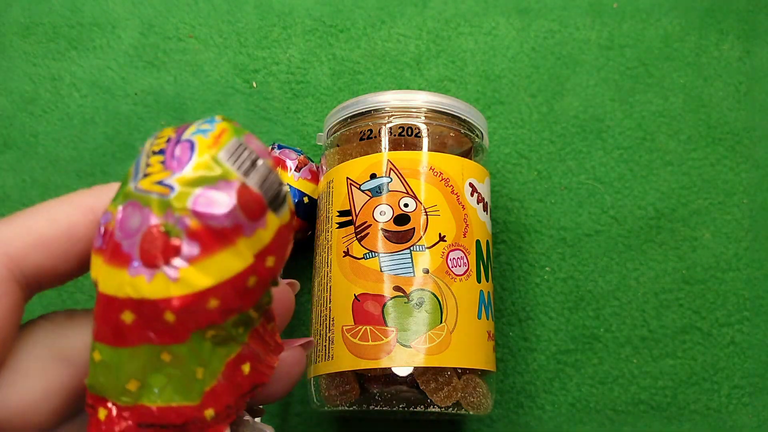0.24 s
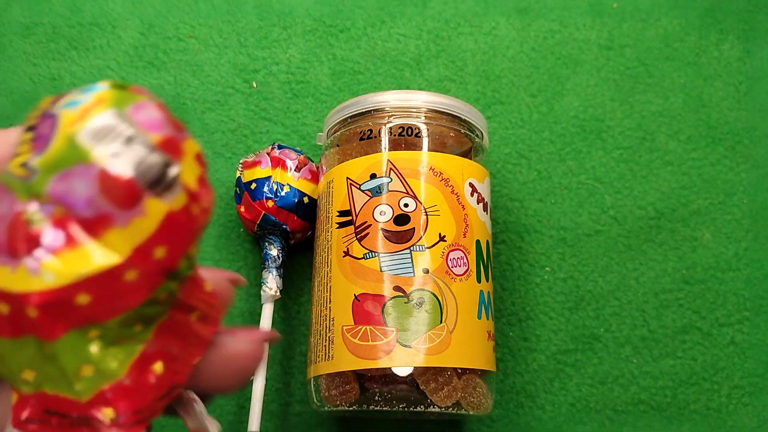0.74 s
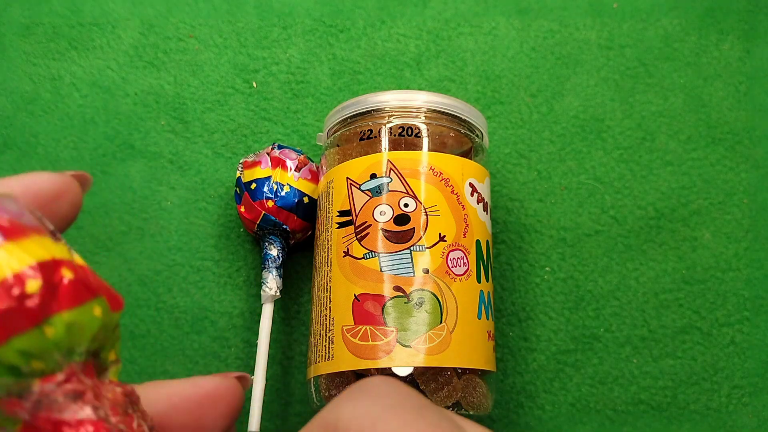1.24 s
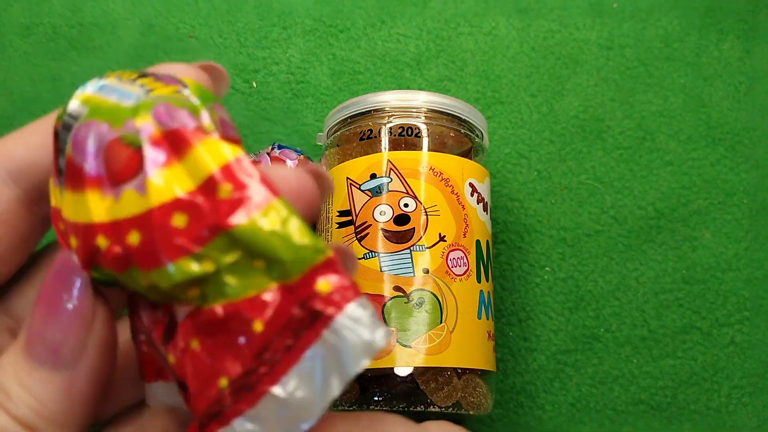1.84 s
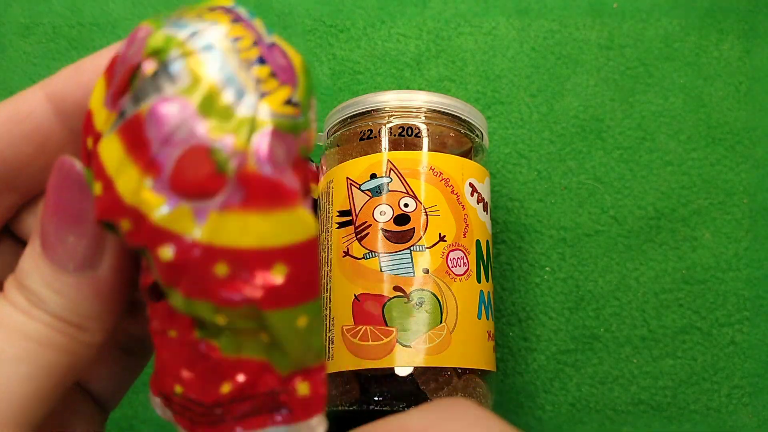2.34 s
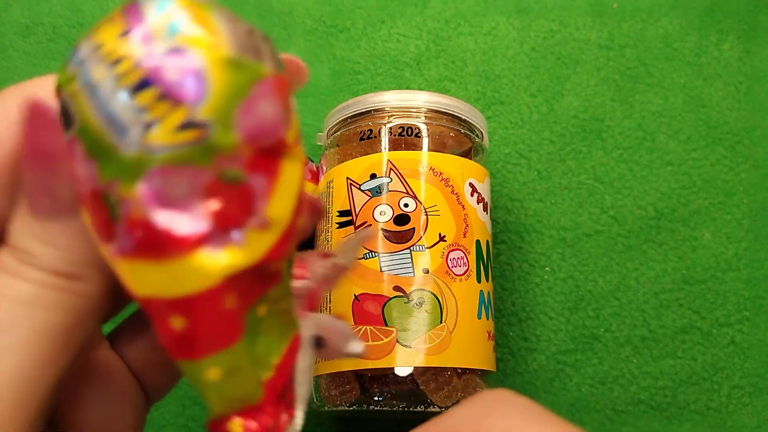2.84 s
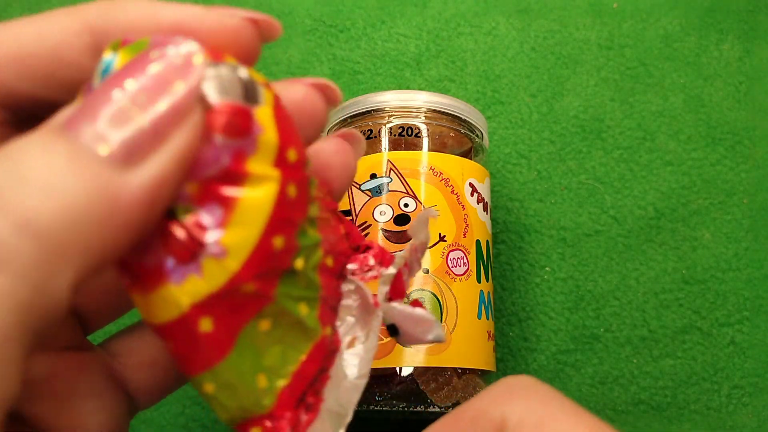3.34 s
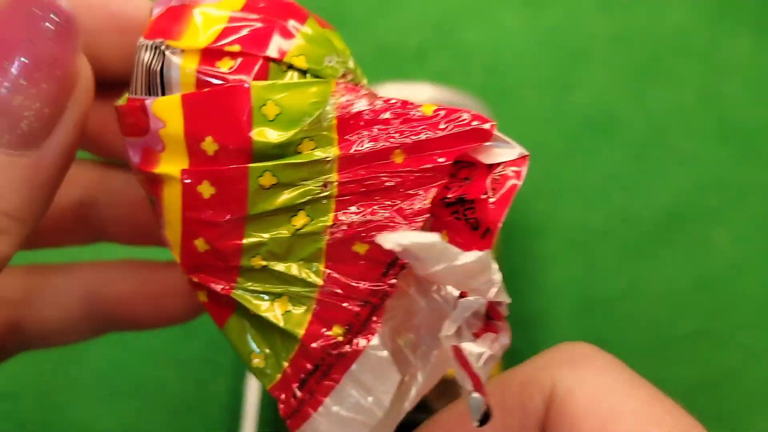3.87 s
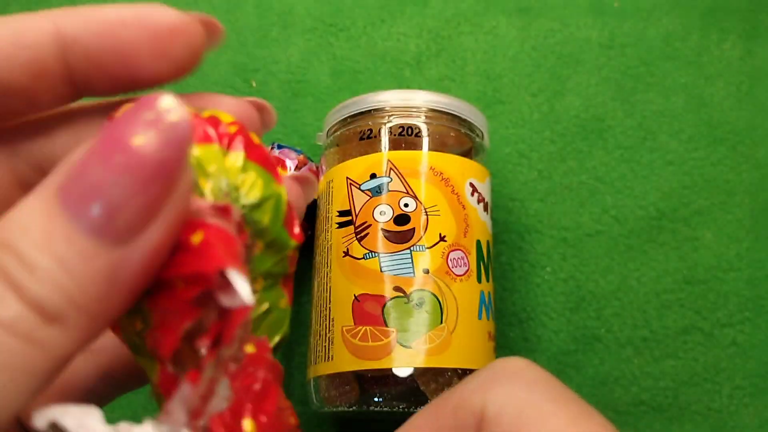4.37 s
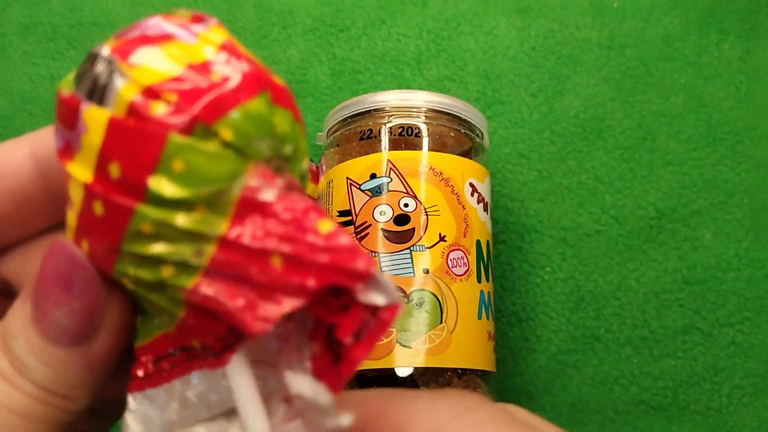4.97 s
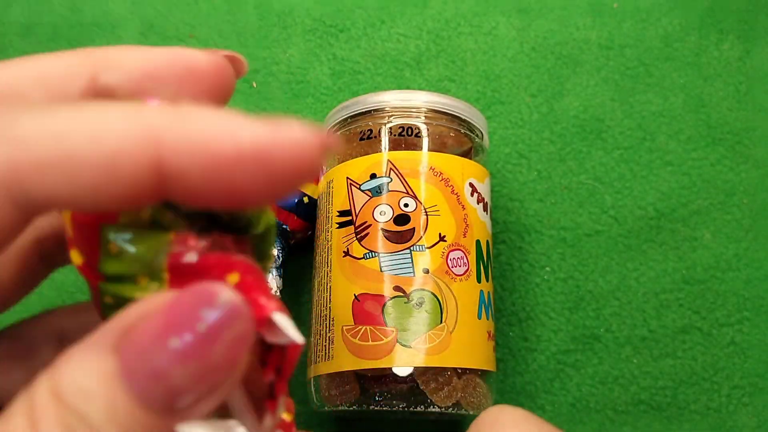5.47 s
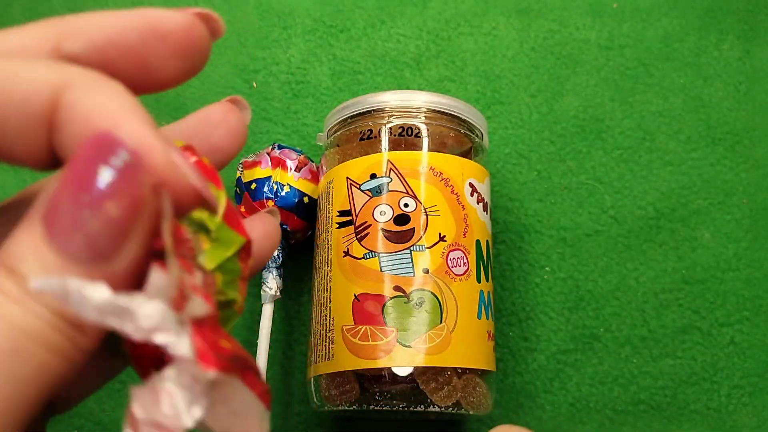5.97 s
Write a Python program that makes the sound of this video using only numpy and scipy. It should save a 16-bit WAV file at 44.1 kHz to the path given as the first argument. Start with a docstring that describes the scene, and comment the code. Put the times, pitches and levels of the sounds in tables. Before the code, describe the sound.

A foil candy wrapper is handled very close to the right side of a stereo microphone in a small, damped, nearly silent room. It begins with faint rustle and a few light ticks; at 0.5 s a tight run of crackles starts, thickening into loud crisp snaps at 0.8-1.0 s. More crinkles follow at 1.1-1.5 s, then a thin, quiet stretch until about 2. A short hollow scrape falls in pitch near 2.3, leading into a strong crunchy burst around 2.5. Isolated sharp cracks and soft rustles continue from 2.7 to 4.2, with a faint rising scrape at 3.2. Fuller crackles return at 4.35, 4.7 and 5.2, with a sharp snap at 5.5. It thins to faint rustle and a barely audible creak near 5.75, then a bright flurry at 6.0 ends with a rough fold creak. Soft dull finger knocks occur occasionally.

```python
"""In a small, damped, nearly silent room, a foil candy wrapper is peeled and twisted by hand at a table,
close to the right port of a small stereo microphone. Creases snap as millisecond noise bursts, and swarms
of random clicks rustle with every squeeze. A fold creaks near the end as regular slips ring its resonances.
Scraping noise rides on a hollow's moving pitch, and soft pushes are fingers knocking the sweet inside.
The table top adds a quick echo, the room a short tail and a faint hush."""
import sys
import numpy as np
from scipy import signal
from scipy.fft import rfft, irfft, next_fast_len
from scipy.io import wavfile

SR = 44100
rng = np.random.default_rng(int(sys.argv[2]) if len(sys.argv) > 2 else 0)


def int16_out(signal):
    """Quantize to a 16-bit WAV file."""
    q = np.round(np.clip(np.atleast_2d(signal).T, -1, 1) * 32767)
    wavfile.write(sys.argv[1], SR, q.astype(np.int16))


N = 273861
SIZE = next_fast_len(N + SR // 2)   # transform length, with space for the tails
HZ = np.maximum(np.arange(SIZE // 2 + 1) * SR / SIZE, 1)

# Pairs are left, right.
SNAP_PAN_DB, SNAP_PAN_SPREAD_DB = -8, 4.5   # a snap at the left port against the right: mean and spread
SCATTER_S, SCATTER_DB = [0.0026, 0.0021], [-4.5, -16.5]   # reflections off hands and foil: decay, level
BUCKLES_PER_S, BUCKLE_SPREAD_DB = 5000, 2.07
RUSTLE_LIKENESS = 0.1   # share of the rustle's power that is alike at both ports
KNOCK_BAND_HZ, KNOCK_S = (133, 456), 0.00035
KNOCK_GAIN_DB = 29   # added to every knock
LEFT_LAG_SAMPLES = 14
TABLE_ECHO_S, TABLE_ECHO_DB = [0.0022, 0.0025], -26.5   # delay after the direct sound
ROOM_T60_S, ROOM_DB, WALL_CUT_HZ = 0.19, [-6, -17], 8000
HUSH_DB = -85   # rms
CUTOFF_HZ = 16900


def from_db(db):
    """Amplitude factor of a level in dB."""
    return 10 ** (np.asarray(db) / 20)


def rms_one(x):
    """Scale a sound to an rms of 1."""
    return x / np.sqrt(np.mean(x ** 2) + 1e-20)


def in_time(rows):
    """Columns of a curve table, sample by sample."""
    s, *columns = np.transpose(rows)
    return [np.interp(np.arange(N) / SR, s, column) for column in columns]


def at_hz(points):
    """A spectrum table in dB, drawn over log frequency on the frequency grid."""
    hz, db = np.transpose(points)
    return np.interp(np.log(HZ), np.log(hz), db)


def causal(db):
    """Minimum-phase response of a dB spectrum, by folding its cepstrum."""
    cepstrum = irfft(db * np.log(10) / 20, SIZE)
    cepstrum[1:SIZE // 2] *= 2
    cepstrum[SIZE // 2 + 1:] = 0
    return np.exp(rfft(cepstrum))


def drift(rate_hz):
    """Slow random wandering with an rms of 1: noise through two equal one-pole lowpasses."""
    r = np.exp(-2 * np.pi * rate_hz / SR)
    wander = signal.lfilter([1], [1, -2 * r, r * r], rng.standard_normal(N + 4000))
    return rms_one(wander[4000:])   # skips the filter's start


def dying_noise(t60, count):
    """Noise that dies away exponentially, energy 1."""
    tail = rng.standard_normal(count) * from_db(-60 * np.arange(count) / SR / t60)
    return tail / np.sqrt(np.sum(tail ** 2))


def band(x, low_hz, high_hz):
    """Keep one band of a sound."""
    sos = signal.butter(2, [low_hz, high_hz], "band", fs=SR, output="sos")
    return signal.sosfilt(sos, x)


def snaps(port):
    """Each crease bursts with its own thud, body, edge and crack, scattered anew to each port."""
    # The creases that snap. Each row: start in seconds, then the peaks of thud, body, edge and crack in dB,
    # as coloured by the near port before scattering.
    creases = [(0.0597, -83.0, -59, -41, -45), (0.2024, -66, -64, -40, -49), (0.3373, -98, -81, -57, -61.5),
               (0.5099, -74, -47.0, -35, -37), (0.5232, -56.0, -55.0, -53, -53),
               (0.5307, -55, -36, -37, -43), (0.538, -60, -38, -38, -45), (0.5415, -34, -44, -39.0, -37),
               (0.554, -68.0, -46, -33, -40.0), (0.5618, -54, -42.5, -37, -46.0),
               (0.5671, -69, -35, -33.0, -37.0), (0.5806, -72.0, -53, -36, -44),
               (0.5911, -58.0, -45, -39.0, -42.5), (0.607, -54, -41, -44, -41),
               (0.6211, -47, -36.5, -31.5, -32.5), (0.6349, -48, -38, -46, -40),
               (0.727, -61.5, -38.5, -34, -38), (0.7966, -39, -30.5, -28, -27),
               (0.82, -66.0, -62.0, -37.5, -40), (0.8712, -36, -37, -25.5, -22.5),
               (0.8764, -48, -32, -18.5, -42), (0.8816, -54.0, -24.5, -20, -18.5),
               (0.9115, -45, -23, -24, -42), (0.9237, -49.0, -46, -27, -27),
               (0.9502, -56, -40, -59.0, -58.0), (0.9805, -62, -53.0, -38, -34.5),
               (0.9959, -51, -41, -39, -42.0), (1.096, -37, -23.5, -28.0, -28.5),
               (1.1457, -78, -68.0, -52, -36), (1.1646, -62, -60, -36, -30),
               (1.1736, -74.0, -53.0, -43, -31.0), (1.1789, -39, -28.5, -28.5, -25),
               (1.1856, -61, -32, -26.5, -21.5), (1.2438, -69, -58, -52, -55),
               (1.3707, -44, -34, -40.0, -40), (1.381, -37, -61, -47, -30.5),
               (1.4492, -39.5, -52, -31, -28), (1.4611, -66, -36, -33, -24),
               (1.7044, -83.0, -66, -47, -40.5), (1.89, -84.0, -60, -50, -35),
               (2.0465, -75, -65.0, -38.5, -40), (2.111, -36.5, -59, -51, -28.5),
               (2.137, -59, -52, -42.0, -42), (2.154, -49, -32, -24, -25),
               (2.2362, -54.0, -59.0, -33, -28.0), (2.244, -69, -62.0, -40, -30),
               (2.249, -53.0, -63.0, -55, -32), (2.256, -44, -53, -41.0, -31.0),
               (2.3317, -45, -41, -30, -37), (2.3959, -43.0, -42, -29.5, -29.5),
               (2.4435, -52, -34, -41, -34), (2.4546, -47, -37.0, -28, -25.5), (2.4678, -49, -30, -40, -36),
               (2.471, -45, -26, -22, -21.5), (2.4773, -33, -40, -39, -29),
               (2.4852, -31, -44.0, -44.0, -34), (2.4868, -31.5, -41, -35.0, -24.5),
               (2.5098, -32.5, -39, -29, -31), (2.5737, -89, -65.0, -61.0, -33),
               (2.6393, -76, -69, -58, -39.5), (2.686, -46, -40, -32, -27.0), (2.73, -35, -35.5, -41, -37),
               (2.742, -34.5, -31.5, -31.5, -47), (2.8892, -55, -45, -26, -16.5),
               (3.0137, -52, -42.5, -47.0, -46), (3.09, -55, -41, -35.5, -31.5),
               (3.1346, -49, -41.5, -49, -46), (3.201, -69, -62, -55, -44), (3.2068, -82, -69, -62, -36.5),
               (3.368, -65, -46, -27.0, -20.5), (3.4351, -46.5, -36.5, -54, -28.5),
               (3.4619, -48.5, -26, -26.5, -20.5), (3.5012, -46.5, -42, -38, -33.5),
               (3.5501, -52.5, -41, -33, -32.0), (3.58, -55, -33, -31.5, -27.5),
               (3.6147, -58, -39, -47, -26.5), (3.6443, -44.5, -34.5, -29, -21.5),
               (3.7633, -52, -35.5, -21, -18), (3.8798, -66.5, -61, -42.5, -42),
               (3.9547, -65, -47, -52, -20.5), (3.979, -76.0, -62.0, -52, -36.5),
               (4.0422, -43.5, -30, -30, -31), (4.0726, -52, -42, -31, -41), (4.075, -51, -51, -51, -28.5),
               (4.1049, -59, -54, -48, -41), (4.1434, -70, -54, -38.5, -47), (4.1833, -59, -33, -45, -16.5),
               (4.3232, -54, -54, -38.5, -28.5), (4.3422, -37.5, -46, -51, -38),
               (4.3531, -37, -33, -32, -45), (4.3551, -41, -35, -49, -33), (4.3627, -31, -24.0, -20, -24.0),
               (4.518, -43, -27, -37, -31), (4.698, -27, -21.5, -18.5, -19),
               (4.7446, -52, -42.0, -26.0, -25), (4.7796, -56, -49, -38, -18.0),
               (4.8135, -40, -28, -26.5, -23), (4.862, -62, -43, -28.5, -29),
               (4.8732, -82, -70, -51, -32.5), (4.9685, -62.0, -43, -37.0, -21),
               (5.0063, -65.0, -44, -37, -34), (5.0181, -61, -41, -33, -17.5),
               (5.0724, -77, -66.0, -60.0, -40), (5.1624, -70.5, -38, -30.0, -28.5),
               (5.1668, -56, -41, -33, -32), (5.1884, -51, -35, -33, -26.5),
               (5.2021, -62.0, -36, -24.5, -29), (5.2051, -38, -38, -27, -21),
               (5.2258, -41, -25.0, -17, -19), (5.3085, -68, -59, -58, -59),
               (5.4329, -56, -36.5, -35, -28.5), (5.4712, -65, -54, -37, -31.5),
               (5.4855, -37.5, -35.5, -44, -16.0), (5.8627, -50.5, -33.5, -34.5, -41),
               (5.9445, -52.5, -55, -49, -29.0), (5.9924, -47, -39, -46, -29.0),
               (6.0028, -43, -34, -49, -24), (6.009, -39.0, -39.0, -32, -18),
               (6.0151, -33, -24.5, -21.5, -15.5), (6.0306, -61, -58.0, -49.0, -28.0),
               (6.0538, -40, -32, -33, -11.5), (6.0562, -42.0, -37.0, -33, -23),
               (6.1552, -58, -38, -42, -29), (6.1688, -52, -35, -31.0, -29.0),
               (6.1827, -62.0, -34.0, -35.0, -53)]
    # Thud, body, edge and crack. Each row: low edge in Hz, high edge in Hz, length of the contact in seconds.
    burst_parts = [(556, 1165, 0.00078), (1460, 2337, 0.00065), (2840, 4190, 0.00042),
                   (4740, 12100, 0.00014)]
    rows = np.array(creases)
    time = np.arange(500) / SR
    noise = rng.standard_normal((len(rows), 3, 500))
    left_noise, right_noise, rattle = noise[:, 0], noise[:, 1], noise[:, 2]
    rattle[:, 6] = 4.7 * np.sign(rattle[:, 6])   # the buckle itself is one broad click amid its rattle

    bursts = 0
    for k, (low_hz, high_hz, length) in enumerate(burst_parts):
        quick_swell = time * np.exp(-2 * time / length)
        part = band(rattle * quick_swell, low_hz, high_hz)
        heard = signal.fftconvolve(part, port[None, :200], axes=1)
        gain = from_db(rows[:, 1 + k]) / np.abs(heard).max(axis=1)
        bursts = bursts + part * gain[:, None]

    out = np.zeros((2, N + 500))
    at = np.round(rows[:, 0] * SR).astype(int)[:, None] + np.arange(500)
    left_pan_db = SNAP_PAN_DB + SNAP_PAN_SPREAD_DB * rng.standard_normal((len(rows), 1))
    for side, (side_noise, pan_db) in enumerate([(left_noise, left_pan_db), (right_noise, 0)]):
        scatter = side_noise * from_db(SCATTER_DB[side]) * np.exp(-time / SCATTER_S[side])
        scatter[:, 0] = 1   # direct sound
        scattered = signal.fftconvolve(bursts, scatter, axes=1)[:, :500]
        np.add.at(out[side], at, from_db(pan_db) * scattered)
    return out[:, :N]


def squeezing():
    """Level in dB of each part of the rustle: squeezes swell and fade exponentially, their powers add."""
    # Squeezes of the foil. Each row: peak time in seconds, swell and fade in seconds per 20 dB,
    # rustle level in dB, then thud and crack in dB relative to it.
    squeezes = [(.04, 0.12, 0.35, -63.5, -8, 1.5), (0.202, 0.019, 0.012, -51, -17, -5),
                (.343, 0.02, 0.025, -71, -30, 4), (.43, 0.018, 0.13, -75, -4, 7.5),
                (0.511, 0.0086, .1, -57.5, -9.5, -7), (.56, 0.13, 0.22, -61, -5, -4),
                (.8, 0.012, 0.3, -53, -26, 7), (0.927, 0.1, 0.054, -40.5, -13, -8),
                (1.078, 0.036, 0.13, -50.5, -20, -6), (1.182, 0.045, 0.026, -42.5, -14, 3),
                (1.213, .05, 0.12, -62, -15, 5), (1.357, 0.013, 0.13, -47.5, -12.5, -4.5),
                (1.461, 0.033, 0.014, -46.5, -4.5, -1.5), (1.708, 0.048, 0.051, -67, -5, 14),
                (1.862, 0.094, 0.056, -56.5, -11, 7.5), (1.957, 0.035, 0.85, -61, -26, 5.4),
                (2.09, 0.14, .037, -53.5, -10, 3), (2.149, 0.016, 0.072, -53.5, 1, 14),
                (2.341, 0.24, 0.053, -46, -5.5, 4), (2.481, 0.017, 0.058, -34, -5, -6.5),
                (2.53, 0.035, 0.24, -57.5, -11, 2), (2.696, 0.013, 0.048, -47, 4, -11),
                (2.89, 0.05, 0.17, -47.5, -10, 0.9), (3.017, 0.021, 0.11, -57, -8.5, 1.5),
                (3.193, 0.18, 0.029, -61.5, -3.5, 0.8), (3.368, 0.011, 0.6, -56.5, -9, 3),
                (3.649, 0.2, 0.15, -53, -15.5, 1), (3.765, 0.011, 0.054, -51.5, -5, 14),
                (4.002, 0.051, 0.13, -81, -25, 18), (4.261, 0.44, 0.055, -66.5, -2, 10.5),
                (4.356, 0.029, 0.084, -46.5, -13, -4.5), (4.5, .015, 0.078, -48, -18.5, 1),
                (4.545, 0.073, 0.011, -46.5, -23, 1.5), (4.691, 0.17, 0.08, -49, -5, 4.5),
                (4.821, 0.17, 0.73, -55, -14.5, -1.5), (5.013, 0.19, 0.03, -57, -10.5, 5),
                (5.08, .05, 0.2, -78, -3, 14), (5.17, 0.022, 0.23, -46.5, -16.5, 1),
                (5.235, 0.054, 0.024, -52, 0.5, -10), (5.38, 0.21, 0.014, -69, -30, -2.7),
                (5.482, 0.028, 0.13, -66, -26, 12.5), (5.619, 0.043, 0.054, -72, -6.5, 13.5),
                (5.83, 0.027, 0.18, -67, -19, 6), (5.875, 0.035, 0.11, -59, -10.5, 4.5),
                (6.01, 0.045, 0.17, -43.5, -5, -1), (6.21, 0.082, .1, -50.5, -7, -7)]
    peak_s, swell_s, fade_s, level_db, thud_db, crack_db = np.transpose(squeezes)[:, :, None]
    time = np.arange(0, N + 64, 64) / SR   # a coarse grid is enough
    shape_db = level_db - 20 * np.maximum((peak_s - time) / swell_s, (time - peak_s) / fade_s)
    levels = []
    for part_db in (thud_db, 0, crack_db):
        power = np.sum(from_db(2 * (shape_db + part_db)), axis=0)
        levels.append(np.interp(np.arange(N) / SR, time, 10 * np.log10(power + 1e-30)))
    return levels


def rustle(port):
    """Tiny buckles come in clumps; patches of foil favour now one pitch, now another."""
    # Thud, middle and crack of the rustle. Each row: low edge in Hz (widened below), high edge in Hz,
    # length of the contact in seconds (unused here).
    swarm_parts = [(525, 1550, 0.00073), (1420, 4330, 0.00088), (5220, 12830, 0.00014)]
    born = rng.random(N) < BUCKLES_PER_S * from_db(2.5 * drift(60)) / SR
    size_db = BUCKLE_SPREAD_DB * np.minimum(rng.exponential(1, N), 4.0)
    buckles = born * from_db(size_db) * rng.choice([-1, 1], N)

    out = 0
    for (low_hz, high_hz, _), part_db in zip(swarm_parts, squeezing()):
        edges = np.geomspace(low_hz * 0.706, high_hz, 8)
        part = 0
        for low, high in zip(edges, edges[1:]):
            favour_db = rng.normal(0, 7.46, N) + 3.53 * drift(4.0)   # per buckle, plus slow wandering
            part = part + band(buckles * from_db(favour_db) + 1e-18, low, high)
        out = out + from_db(part_db) * part / np.std(signal.fftconvolve(part, port))

    # buckles all over the foil reach the far port by paths of changing length
    detour = np.interp(np.arange(N) - 40 - 3.7 * drift(45), np.arange(N), out)
    left = np.sqrt(RUSTLE_LIKENESS) * out + np.sqrt(1 - RUSTLE_LIKENESS) * detour
    return np.array([left, out])


def creak():
    """A fold sticks and slips; the nearly regular slips ring its resonances."""
    # The fold's motion. Each row: time in seconds, slips per second, level in dB, upper modes in dB.
    stick_slip = [(5.68, 230, -100, -23), (5.69, 230, -73, -29), (5.73, 170, -66.5, -41),
                  (5.765, 140, -60, -31), (5.785, 210, -60, -30), (5.8, 210, -100, -16),
                  (6.05, 240, -100, 0), (6.07, 166, -51.5, 1.5), (6.12, 180, -46.5, -6),
                  (6.14, 130, -48, 1), (6.21, 98, -39.5, -0.5)]
    # The fold's resonances. Each row: frequency in Hz, width in Hz, level in dB.
    modes = [(1030, 100, 3), (1960, 310, 6.5), (3900, 1100, -17), (6690, 2100, -3)]
    per_s, level_db, bright_db = in_time(stick_slip)
    turns = np.cumsum(per_s * (1 + 0.083 * drift(60))) / SR
    slips = np.diff(np.floor(turns), prepend=0) * from_db(rng.normal(0, 2.72, N))
    out = 0
    for k, (hz, width_hz, db) in enumerate(modes):
        r = np.exp(-np.pi * width_hz / SR)
        mode = signal.lfilter([1, 0, -1], [1, -2 * r * np.cos(2 * np.pi * hz / SR), r * r], slips)
        out = out + rms_one(mode) * from_db(level_db + db + bright_db * (k > 0))
    return out


def rub():
    """Foil dragged over the sweet: rough scraping in a narrow band, carried on the hollow's moving pitch."""
    # The hollow under the foil. Each row: time in seconds, pitch of the hollow in Hz, level in dB.
    drags = [(2.14, 807, -105), (2.17, 800, -60), (2.26, 597, -53), (2.33, 353, -36), (2.39, 336, -105),
             (3.11, 403.7, -105), (3.18, 433, -47), (3.25, 566, -105)]
    hollow_hz, level_db = in_time(drags)
    grit = (rng.random((2, N)) < 400 / SR) * rng.standard_normal((2, N))   # about 400 grains per second
    slow = signal.sosfilt(signal.butter(2, 90, fs=SR, output="sos"), grit + 1e-18)
    phase = 2 * np.pi * np.cumsum(hollow_hz) / SR
    scrape = rms_one(slow[0] * np.cos(phase) + slow[1] * np.sin(phase))
    return from_db(level_db) * (level_db > -95) * scrape   # silent between drags


def knocks():
    """Fingers knock the sweet inside: a short soft push, heard only in the bass."""
    # The knocks. Each row: start in seconds, level in dB before the knock gain.
    touches = [(0.622, -59), (0.797, -53.5), (0.872, -56), (0.923, -49), (1.461, -55.5), (2.397, -50),
               (3.539, -59), (4.041, -55), (4.695, -64), (4.814, -49), (6.015, -54.5)]
    clicks = np.zeros(N)
    for s, db in touches:
        clicks[round(s * SR)] = from_db(db + KNOCK_GAIN_DB)
    push = np.hanning(round(2 * KNOCK_S * SR))
    return band(np.convolve(clicks, push)[:N] + 1e-18, *KNOCK_BAND_HZ)


def paths():
    """Direct sound and table echo for each port; the left one is farther and lags."""
    out = np.zeros((2, 300))
    out[:, 0] = 1
    for side in range(2):
        out[side, round(TABLE_ECHO_S[side] * SR)] = from_db(TABLE_ECHO_DB)
    out[0] = np.roll(out[0], LEFT_LAG_SAMPLES)
    return out


def room(foil):
    """Spectrum of diffuse tails after the first walls answer; the hands move, so their fine pattern changes."""
    place = (np.arange(N) // 3000 * 7 + np.arange(N) // 11000) % 5
    out = 0
    for k in range(5):
        tails = [from_db(db) * dying_noise(ROOM_T60_S, count=SR // 3) for db in ROOM_DB]
        tails = np.pad(tails, [(0, 0), (220, 0)])   # 5 ms until the first walls answer
        out = out + rfft(foil * (place == k), SIZE) * rfft(tails, SIZE)
    return out / (1 + 1j * HZ / WALL_CUT_HZ)   # the treble is damped


def hush():
    """The nearly silent room: steady noise with a shaped spectrum, separate at each port."""
    # Colour of the hush. Each row: frequency in Hz, relative level in dB per Hz.
    hush_colour = [(24, -37), (40, -7), (65, -7), (124, -1.5), (308, -1.5), (1750, -24.5), (2490, -25),
                   (16500, -27)]
    spectrum = rfft(rng.standard_normal((2, SIZE))) * from_db(at_hz(hush_colour))
    return from_db(HUSH_DB) * rms_one(irfft(spectrum, SIZE)[:, :N])


def scene():
    """Foil through the paths, the room and the colour of each port, over the hush."""
    # Foil as the near, right port colours it. Each row: frequency in Hz, level in dB.
    near_colour = [(18, -76), (30, -21), (467, -11.5), (593, -10.5), (814, -3.5), (1240, -9), (1660, -7),
                   (1890, -11), (2160, -4.5), (3660, -0.5), (4650, -5), (7090, 1.5), (9480, -30.5),
                   (15200, -18.5), (16500, -48)]
    # The left port relative to the right. Each row: frequency in Hz, level in dB.
    far_colour = [(60, -11), (110, -17.5), (200, -16), (380, -14), (700, -19), (1290, -8.5), (2380, -12),
                  (4400, -8), (8120, -20.5), (15000, -11.5)]
    near = causal(at_hz(near_colour))
    far = causal(at_hz(near_colour) + at_hz(far_colour))
    port = irfft(near, SIZE)[:2000]
    foil = snaps(port) + rustle(port) + creak() + rub() + knocks()
    arriving = rfft(foil, SIZE) * rfft(paths(), SIZE) + room(foil[1])
    heard = irfft(arriving * [far, near], SIZE)[:, :N]
    return heard + hush()


def record(dry):
    """The top is cut steeply: a lowpass that is 60 dB down from the cutoff on."""
    return signal.sosfilt(signal.cheby2(12, 60, CUTOFF_HZ, fs=SR, output="sos"), dry)


dry = scene()
out = record(dry)
int16_out(out)
```